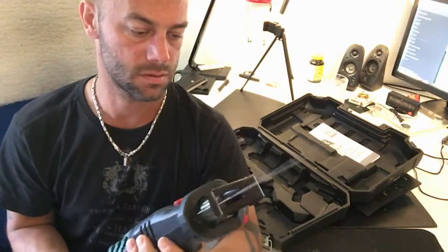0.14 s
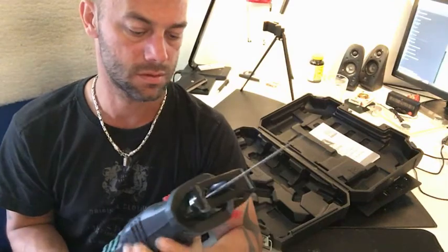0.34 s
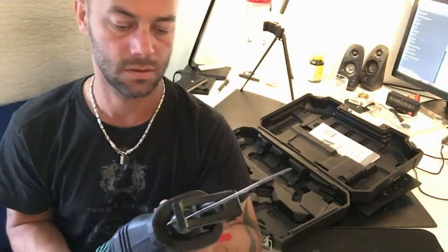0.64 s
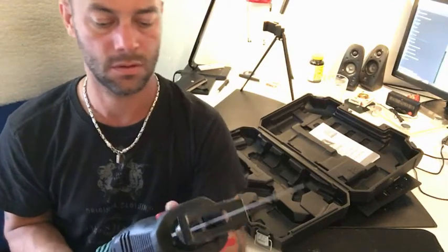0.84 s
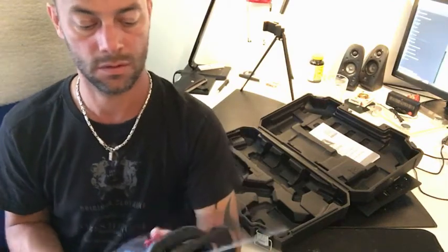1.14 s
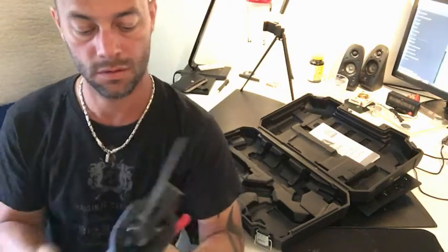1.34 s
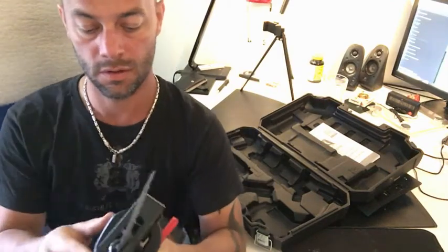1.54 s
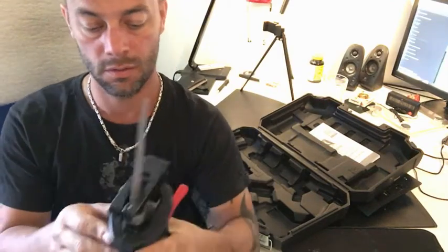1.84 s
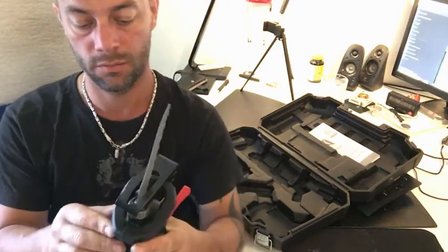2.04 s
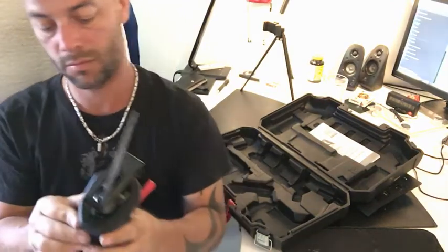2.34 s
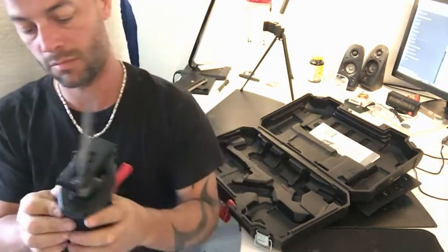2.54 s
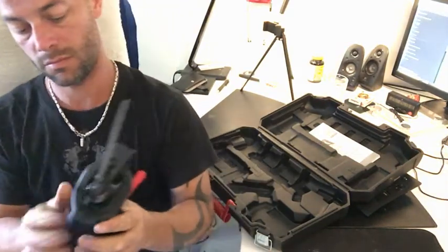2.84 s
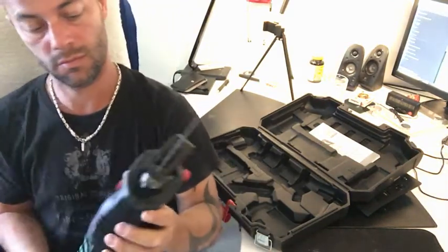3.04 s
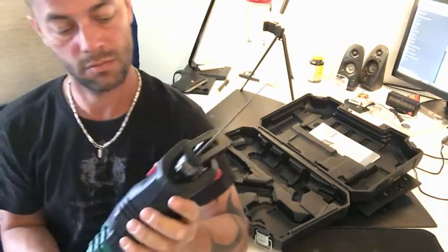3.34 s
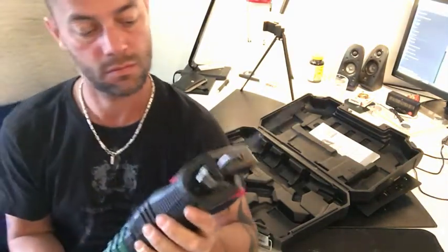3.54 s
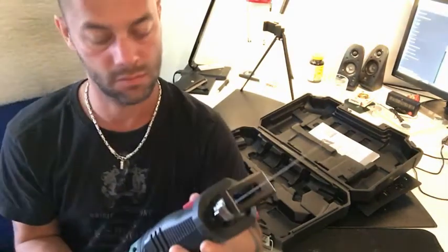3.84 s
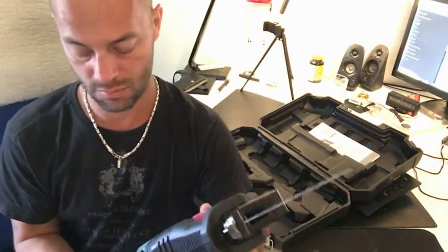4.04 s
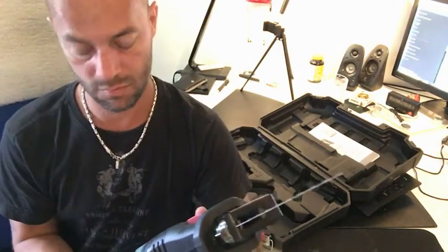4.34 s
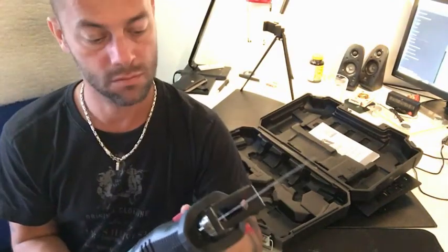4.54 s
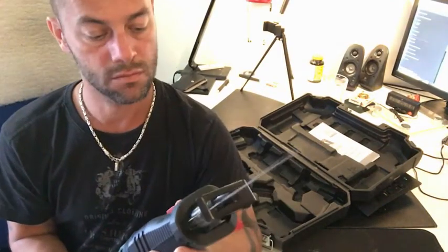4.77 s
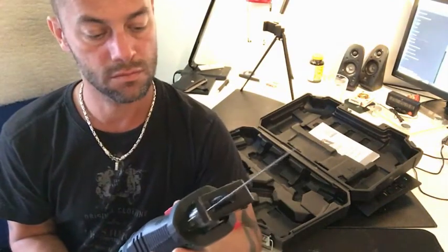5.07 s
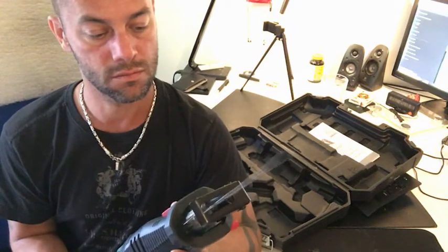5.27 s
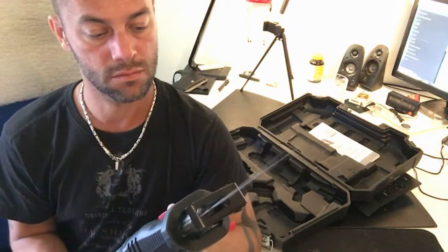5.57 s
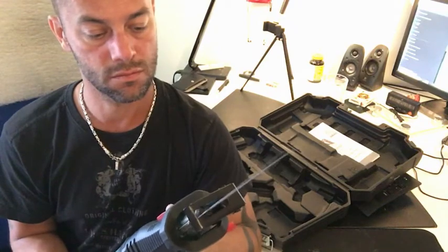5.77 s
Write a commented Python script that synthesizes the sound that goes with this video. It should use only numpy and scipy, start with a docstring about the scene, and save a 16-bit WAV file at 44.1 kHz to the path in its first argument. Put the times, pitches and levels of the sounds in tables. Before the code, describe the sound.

A hand-held saw is triggered briefly at a desk, rasping gears and hard shaft clacks stopping abruptly each time. Long near-quiet handling follows, with soft rubs, thuds and small plastic ticks, split by one loud bright steel snap. Late on, two full-speed blips lead to a slower, distinctly chugging run. The microphone is close, with short room reflections and faint low hum.

```python
"""Reciprocating saw in the hand

A cordless saw is blipped at a desk in a small room, turned over, its blade clamp snaps shut; two more blips, a slow run.
Background: shaped noise for a computer's hum, short noise tails for the room.
Hands: noise swells for rubs and thuds, filtered contacts for clicks. Clamp: cracks plus decaying steel sines.
Saw: the crank speed from each trigger pull drives gear noise, motor tones and shaft clacks through shell resonances.
"""
import sys
import numpy as np
from scipy import signal
from scipy.fft import rfft, irfft, next_fast_len
from scipy.io import wavfile
from scipy.ndimage import uniform_filter1d

SR = 44100
rng = np.random.default_rng(int(sys.argv[2]) if len(sys.argv) > 2 else 0)


def int16_out(signal):
    """Quantize to a 16-bit WAV file."""
    q = np.round(np.clip(np.atleast_2d(signal).T, -1, 1) * 32767)
    wavfile.write(sys.argv[1], SR, q.astype(np.int16))


N = 260631


def amp(db):
    """Decibels to gain."""
    return 10 ** (np.asarray(db) / 20)


def unit(x):
    """Scale to rms 1."""
    return x / np.sqrt(np.mean(x ** 2) + 1e-20)


def noise(count):
    """White noise, rms about 1."""
    return rng.standard_normal(count)


def along(points, hz):
    """Interpolate (frequency [Hz], value) points on a log-frequency axis."""
    point_hz, value = np.transpose(points)
    return np.interp(np.log(hz + 1), np.log(point_hz + 1), value)


def hump(centre_hz, octaves):
    """Gaussian band on a log-frequency axis, as dB against Hz; octaves is its standard deviation."""
    return lambda hz: -20 / np.log(10) * (np.log2((hz + 1) / centre_hz) / octaves) ** 2 / 2


def coloured(x, shape_db):
    """Filter x by a dB shape: minimum phase by folding the cepstrum, unit energy."""
    size = 8192
    gain = amp(shape_db(np.fft.rfftfreq(size, 1 / SR)))
    cepstrum = irfft(np.log(gain + 1e-6))
    cepstrum[1:size // 2] *= 2
    cepstrum[size // 2 + 1:] = 0
    response = irfft(np.exp(rfft(cepstrum)))
    return signal.oaconvolve(x, response / np.linalg.norm(response))[:len(x)]


def add(track, start_s, sound):
    """Mix a sound into a track."""
    start = max(round(start_s * SR), 0)
    part = track[start:start + len(sound)]
    part += sound[:len(part)]


def contact(t60, clean):
    """One contact: a one-sample blow (energy share clean) plus chatter decaying 60 dB in t60 seconds."""
    t = np.arange(SR // 10) / SR
    chatter = noise(len(t)) * amp(-60 * t / t60)
    blow = np.linalg.norm(chatter) * (t == 0)
    return np.sqrt(clean) * blow + np.sqrt(1 - clean) * chatter


def swell(length_s):
    """Gaussian rise and fall: 1/e at length_s either side of a peak at 3 * length_s."""
    return np.exp(-np.linspace(-3, 3, round(6 * length_s * SR)) ** 2)


# Computer and room spectrum: (frequency [Hz], relative level [dB])
HUM_SPECTRUM = [(15, -49), (25, -22), (96, -13), (119, -15.5), (193, -7.5), (221, -16.5), (260, -5),
                (349, -10), (421, -15.5), (482, -25.5), (598, -21.5), (1450, -26.5), (2420, -29),
                (15500, -48)]
HUM_DB = -61


def computer_hum():
    """Steady air noise of the computer."""
    air = coloured(noise(N + SR), lambda hz: along(HUM_SPECTRUM, hz))
    return amp(HUM_DB) * unit(air[SR:])  # filter onset dropped


# Reverberation of desk and near walls: (frequency [Hz], t60 [s])
ROOM_DECAY = [(200, 0.31), (1000, 0.3), (4000, 0.28), (12000, 0.18)]


def room_tail(x, delay_s):
    """Desk and walls answer with short dense tails, renewed every 1/8 s as the saw moves in the hand."""
    hop = SR // 8
    fade = np.sin(np.pi * np.arange(2 * hop) / (2 * hop))
    padded = np.pad(x, (hop, 3 * hop))
    out = np.zeros(len(padded))
    for start in range(0, N + hop, hop):
        hz, t, z = signal.stft(noise(SR // 3), SR, nperseg=256)
        decay = amp(-60 * t / along(ROOM_DECAY, hz)[:, None])
        tail = signal.istft(z * decay, SR, nperseg=256)[1]
        answer = signal.fftconvolve(padded[start:start + 2 * hop] * fade, tail / np.linalg.norm(tail))
        add(out, start / SR + delay_s, answer)
    return out[hop:hop + N]


# Palms and sleeves on the shell, scraping shaft and collar:
# (middle [s], 1/e half-length [s], level [dB], centre [Hz], standard deviation [octaves])
RUBS = [(0.556, .035, -35.5, 3570, 0.37), (.622, .012, -38, 3100, .6), (0.841, .008, -49, 2300, 1),
        (0.871, .03, -55, 1796, 0.892), (.932, 0.056, -60, 187, .43), (1.178, .03, -64.5, 5950, 1.4),
        (1.322, .03, -65, 4740, 1.2), (1.507, .058, -64.5, 1200, 1.2), (2.026, 0.052, -58, 219, 0.47),
        (2.234, .037, -57, 165, .28), (2.337, 0.0406, -63.5, 118.8, .25), (2.638, .032, -58.5, 2930, 0.78),
        (2.652, 0.007, -31.5, 2900, .72), (3.291, 0.061, -64.5, 3278, 0.83), (3.6, .07, -66, 3440, 0.91),
        (3.713, 0.012, -49.5, 1328, 0.85), (3.772, .034, -54.5, 960, 0.94)]
# Heavy saw shifting against the body: (middle [s], 1/e half-length [s], level [dB])
THUDS = [(1.5, .067, -59), (3.72, 0.059, -57)]
RECOIL_DB, RECOIL_S, RECOIL_LAG_S = -57.5, .04, .004  # jolt on braking from full speed


def handling(grain_db):
    """Rubs are swells of tiny slips with uneven grain; thuds and recoils are deep soft swells."""
    rubs, weight = np.zeros((2, N))
    for middle_s, length_s, db, hz, octaves in RUBS:
        grain = amp(grain_db * unit(uniform_filter1d(noise(SR // 2), size=60)))
        slips = unit(coloured(noise(SR // 2) * grain, hump(hz, octaves)))
        shape = swell(length_s)
        add(rubs, middle_s - 3 * length_s, amp(db) * shape * np.resize(slips, len(shape)))
    recoils = [(off_s + RECOIL_LAG_S, RECOIL_S, RECOIL_DB) for _, _, off_s, top, *_ in PULLS if top == FULL]
    for middle_s, length_s, db in THUDS + recoils:
        add(weight, middle_s - 3 * length_s, amp(db) * swell(length_s))
    return rubs + weight * unit(coloured(noise(N), hump(47, 0.32)))


# Fingers and loose parts on the shell: (time [s], level [dB], part pitch [Hz], tick relative to level [dB])
CLICKS = [(.489, -35.5, 2797, -22.5), (.835, -41.5, 2000, -17), (.843, -43.5, 2100, -21.5),
          (.946, -53, 804, -24), (1.287, -52.5, 2700, -8.5), (1.471, -55, 1524, -12.5),
          (1.527, -50, 2010, -7.5), (2.036, -54, 800, -29), (3.216, -37, 1560, -22),
          (3.598, -40.5, 3000, -32), (3.5995, -42.5, 4300, -32.5), (3.699, -49, 2550, -20),
          (3.714, -48, 1490, -6), (3.762, -51, 940, -22.5), (3.787, -50, 940, -5.5), (4.17, -65, 3500, -24),
          (4.7155, -57.5, 2300, -28.5), (4.786, -46, 2000, -30), (5.055, -35, 2407, -17),
          (5.326, -41, 1700, -23)]
SWITCH_DB, SWITCH_HZ, SWITCH_TICK_DB = -48, 4000, 2.5
# Faint ticks of the shifting grip; levels spread evenly by +-FIDGET_SPREAD_DB, pitches by +-half an octave
FIDGET_PER_S, FIDGET_DB, FIDGET_SPREAD_DB = 3.5, -65.5, 3
FIDGET_HZ, FIDGET_TICK_DB = 3000, -19.5


def small_contacts():
    """Rows as in CLICKS: those, the trigger switch at each pull after 0 s, and random grip ticks."""
    switch = [(on_s, SWITCH_DB, SWITCH_HZ, SWITCH_TICK_DB) for on_s, *_ in PULLS if on_s > 0]
    fidgets = []
    for when, force, part in rng.random((round(FIDGET_PER_S * N / SR), 3)):
        db = FIDGET_DB + FIDGET_SPREAD_DB * (2 * force - 1)
        fidgets.append((when * N / SR, db, FIDGET_HZ * 2 ** (part - .5), FIDGET_TICK_DB))
    return CLICKS + switch + fidgets


# Plastic click spectrum: (frequency [Hz], relative level [dB])
PLASTIC = [(200, -22.5), (600, -12), (1400, 0.5), (2400, -2.5), (3500, -7), (4300, -4.5), (5200, -11),
           (6200, -10.5), (8500, -24), (15000, -36.5)]
KNOCK_DB, KNOCK_DB_PER_OCTAVE = 1.5, -9.5  # relative to the click, for a 1 kHz part; higher parts knock less


def clicks(lift_db, octaves):
    """A plastic click lifted at the part's pitch, with a hollow low knock and a sharp high tick."""
    click, knock, tick = np.zeros((3, N))
    for s, db, pitch_hz, tick_db in small_contacts():
        knock_db = KNOCK_DB + KNOCK_DB_PER_OCTAVE * np.log2(pitch_hz / 1000)
        part = lambda hz: along(PLASTIC, hz) + lift_db * amp(hump(pitch_hz, octaves)(hz))
        add(click, s, amp(db) * coloured(contact(t60=0.02, clean=0.41), part))
        add(knock, s, amp(db + knock_db) * contact(t60=.035, clean=.6))
        add(tick, s, amp(db + tick_db) * contact(t60=0.005, clean=0.43))
    return click + coloured(knock, hump(480, 0.59)) + coloured(tick, hump(11000, 0.96))


# Collar slips, snaps shut, bounces: (time [s], level [dB], clean-blow energy share [0-1])
CLAMP_BLOWS = [(2.6516, -29, .05), (2.6662, -5, .35), (2.6675, -7.5, .2), (2.673, -22, .1)]
# Crack spectrum: (frequency [Hz], relative level [dB])
SNAP = [(60, -71.5), (400, -28), (800, -32.5), (1150, -14.5), (1900, -14), (2700, -3.5), (3200, -8),
        (4400, -2), (5400, -4.5), (6200, -0.5), (8200, -15), (9700, -17), (12500, -23), (15500, -26)]
# Clamp and blade modes: (frequency [Hz], relative level [dB], t60 [s])
STEEL = [(3819, -12.5, 0.43), (4179, -18.5, 0.33), (4169.5, -1, 0.35), (4834.3, 3, 0.11),
         (5308, -1.5, 0.15), (6090.5, -2, 0.3217), (7046, -12, 0.23), (9954, -18.5, 0.17),
         (12480, -13.5, 0.1), (13820, -26.5, 0.27)]


def clamp(ring_db):
    """The spring-loaded collar cracks shut and sets the steel's modes ringing."""
    cracks, rings = np.zeros((2, N))
    t = np.arange(SR // 2) / SR
    for s, db, clean in CLAMP_BLOWS:
        add(cracks, s, amp(db) * contact(t60=0.0057, clean=clean))
        ring = np.zeros(len(t))
        for hz, level_db, t60 in STEEL:
            decay = amp(level_db + rng.normal(0, 2) - 60 * t / t60)
            ring += decay * np.sin(2 * np.pi * hz * t)
        add(rings, s, amp(db + ring_db) * ring)
    return coloured(cracks, lambda hz: along(SNAP, hz)) + rings


SPIN_UP_S = .054
BRAKE_S, COAST_S, COAST_SHARE = .012, .058, .33  # time constants; brake takes most speed, the rest coasts away
LOADED_LAW, COASTING_LAW = 0.97, 1.8  # gear noise gain grows as these powers of speed


def motor(on_s, off_s, top):
    """One pull: linear spin-up, braked and coasting fall; returns crank turns/s and relative gear gain."""
    t = np.arange(N) / SR
    rise = np.clip((t - on_s) / SPIN_UP_S, 0, 1)
    free_s = np.maximum(t - off_s, 0)
    fall = (1 - COAST_SHARE) * np.exp(-free_s / BRAKE_S) + COAST_SHARE * np.exp(-free_s / COAST_S)
    return top * rise * fall, rise ** LOADED_LAW * fall ** COASTING_LAW


FULL, SLOW, CREEP = 38, 19.44, 10  # held crank speeds [turns/s]
# Trigger pulls:
# (switch closes [s], motor starts [s], let go [s], crank speed [turns/s], one stroke's time [s])
PULLS = [(-.02, -.014, .11, FULL, .072), (.218, .221, .359, FULL, .2935), (.467, .475, .571, CREEP, .55),
         (4.816, 4.83, 4.949, FULL, 4.909), (5.034, 5.04, 5.177, FULL, 5.1375),
         (5.296, 5.312, 6, SLOW, 5.6485)]
GEAR_DB, GEAR_DB_PER_OCTAVE = -19.5, 8.5  # at full trigger; slope against held speed


def drive():
    """Crank speed [turns/s] and gear level [dB]: the greatest over all pulls."""
    speed, gain = np.zeros((2, N))
    for _, on_s, off_s, top, _ in PULLS:
        turning, loudness = motor(on_s, off_s, top)
        held_db = GEAR_DB + GEAR_DB_PER_OCTAVE * np.log2(top / FULL)
        speed = np.maximum(speed, turning)
        gain = np.maximum(gain, amp(held_db) * loudness)
    return speed, 20 * np.log10(gain + 1e-6)


def gears(speed, teeth, rotor_ratio, throb_db, scatter_db, rasp):
    """Teeth strike unevenly and rasp between strikes; the load throbs once per rotor turn."""
    speed = np.maximum(speed, 2)
    turns = np.cumsum(speed) / SR
    strikes = np.diff(np.floor(turns * teeth), prepend=0) * amp(scatter_db * noise(N))
    strikes = unit(strikes * rng.choice([-1, 1], N) / np.sqrt(speed))  # even power at any strike rate
    throb = amp(throb_db * np.sin(2 * np.pi * rotor_ratio * turns))
    return unit((strikes + rasp * noise(N)) * throb)


# Motor and gear lines: (multiple of crank speed [ratio], relative level [dB])
WHINE_LINES = [(6.3, -14), (12.6, -22), (23, -18), (75, -19)]


def whine(speed, waver):
    """Rotor and tooth tones follow the crank angle, which wavers by waver turns rms."""
    turns = np.cumsum(speed) / SR + waver * unit(uniform_filter1d(noise(N), size=3000))
    return sum(amp(db) * np.sin(2 * np.pi * multiple * turns) for multiple, db in WHINE_LINES)


STROKE_DB, STROKE_DB_PER_OCTAVE = -13, 7  # at full speed; a slower shaft hits less hard
RETURN_DB, STROKE_SCATTER_DB = -13, 0.5  # far end relative to near end; standard deviation per stroke
CLACKS_ABOVE_TURNS_PER_S = 11  # no clacks at or below


def travel_ends():
    """Rows (time [s], level [dB]): under power the shaft hits an end every half turn, the far end softer."""
    rows = []
    for _, on_s, off_s, top, stroke_s in PULLS:
        speed, _ = motor(on_s, off_s, top)
        turns = np.cumsum(speed) / SR
        halves = np.floor(2 * (turns - turns[round(stroke_s * SR)]))
        for i in np.flatnonzero(np.diff(halves[:round(off_s * SR)])) + 1:
            if speed[i] > CLACKS_ABOVE_TURNS_PER_S:
                db = STROKE_DB + STROKE_DB_PER_OCTAVE * np.log2(speed[i] / FULL)
                rows.append((i / SR, db + RETURN_DB * (halves[i] % 2)))
    return [(s, db + rng.normal(0, STROKE_SCATTER_DB)) for s, db in rows]


# Shaft jerks in its play, out of step with the strokes: (time [s], level [dB])
JERKS = [(0.012, -12.5), (.273, -14), (.524, -32), (.55, -34.5), (0.583, -39), (4.845, -19), (4.866, -21.5)]


def strokes(speed, rebound_db):
    """Strokes and jerks clack; up to about a sixth of a turn later the shaft takes up its play, knocking."""
    clacks, rebounds = np.zeros((2, N))
    for s, db in JERKS + travel_ends():
        turns_per_s = max(speed[min(round(s * SR), N - 1)], 15)
        lag_s = rng.uniform(.94, 1.06) / (6 * turns_per_s)
        add(clacks, s, amp(db) * contact(t60=0.04, clean=.04))
        add(rebounds, s + lag_s, amp(db + rebound_db) * contact(t60=0.027, clean=0.094))
    return clacks, rebounds


# Gear case and plastic shell resonances: (frequency [Hz], width at half lift [Hz], lift [dB])
SHELL_MODES = [(230.94, 60, 4.5), (452, 8.6, 3.5), (842.89, 25, 3), (1245, 70, 3.5), (1433, 77, 2.5),
               (1450, 16, 3.5), (1640, 10, 4), (1896, 68, 6), (2190, 77, 4), (2950, 97, 1.5),
               (3080, 120, 3.5), (3750, 140, 3), (4460, 520, 5.5), (6000, 440, 5), (6955.9, 1100, 5)]
# Saw body spectrum: (frequency [Hz], relative level [dB])
SAW_BODY = [(59, -66.5), (100, -35.5), (228, -18), (281, -20.5), (438, -5.5), (530, -9), (1430, -1),
            (1550, -3), (1880, -2), (3120, -4.5), (5070, -13.5), (6120, -13), (7890, -22.5), (15500, -35.5)]


def shell(x, tilt_db):
    """The saw's body rings; a harder contact has more tilt_db per octave."""
    def shape_db(hz):
        lifts = sum(db / (1 + (2 * (hz - f) / width) ** 2) for f, width, db in SHELL_MODES)
        return along(SAW_BODY, hz) + lifts + tilt_db * np.log2(hz + 1)
    return coloured(x, shape_db)


def saw():
    """Gear noise brightens with speed, tones and sliding show when slow, strokes stand out."""
    speed, gear_db = drive()
    mesh = gears(speed, teeth=75, rotor_ratio=6.3, throb_db=2.2, scatter_db=4, rasp=.8)
    mesh *= amp(gear_db - 1)
    fast = np.clip((speed - 15) / 22, 0, 1)
    tones = amp(gear_db - 4) * (1 - fast) * whine(speed, waver=.001)
    racing = shell(mesh * np.sqrt(fast), tilt_db=.9)
    slow_mesh = mesh * np.sqrt(1 - fast) * rng.choice([-1, 1], N)  # random signs: uncorrelated with racing
    creeping = shell(tones + slow_mesh, tilt_db=-0.7)
    # shaft sliding in its bush
    crawl = np.clip(1 - speed / 18, 0, 1)
    sliding = amp(gear_db + 2.5) * crawl * unit(coloured(noise(N), hump(3200, .48)))
    clacks, rebounds = strokes(speed, rebound_db=-1.5)
    return racing + creeping + sliding + shell(clacks, tilt_db=2.5) + shell(rebounds, tilt_db=-1.8)


def scene():
    """The saw and the hands on it, in the room, over the computer's hum."""
    direct = amp(-0.5) * saw() + clamp(ring_db=-46)
    direct = direct + clicks(lift_db=7.5, octaves=0.14) + handling(grain_db=2.5)
    return (direct + amp(-7.5) * room_tail(direct, delay_s=.003) + computer_hum())[None]


def record(dry):
    """The microphone rounds off the tallest peaks, sheds the deepest bass and has a band limit."""
    size = next_fast_len(N + SR // 2)
    hz = np.fft.rfftfreq(size, 1 / SR)
    rounded = dry / (1 + np.abs(dry / .8) ** 6) ** (1 / 6)
    bass_cut = 1 / np.sqrt(1 + (34 / (hz + 1)) ** 10)
    top_hz = 15900
    return irfft(rfft(rounded, size) * bass_cut * (hz < top_hz), size)[..., :N]


dry = scene()
out = record(dry)
int16_out(out)
```